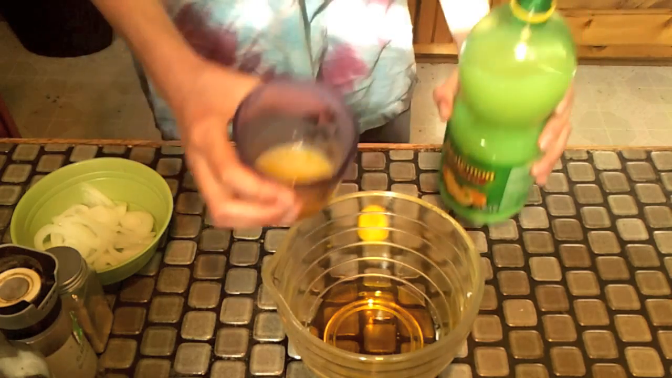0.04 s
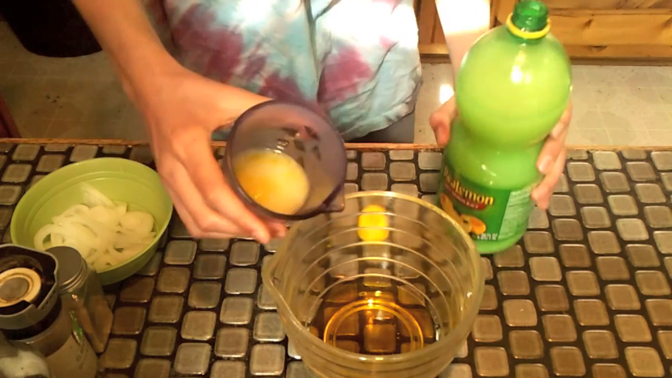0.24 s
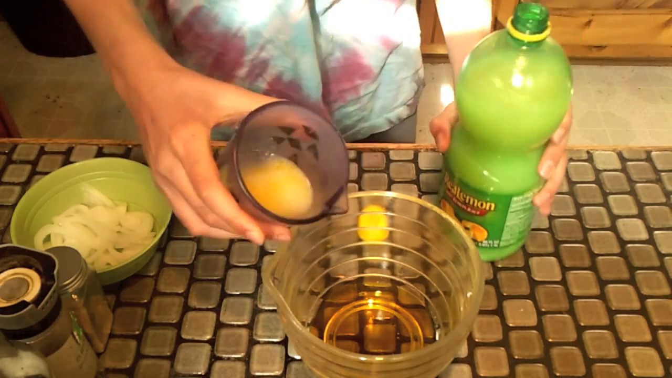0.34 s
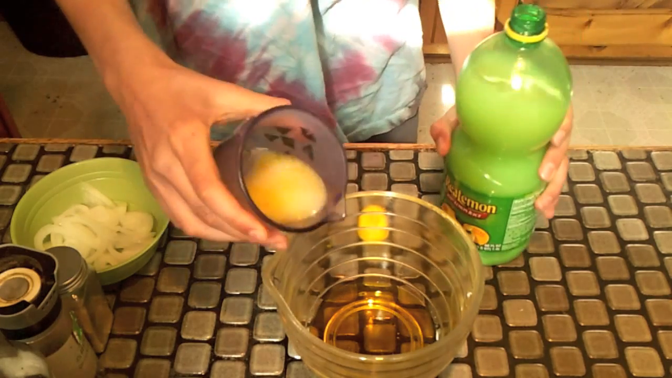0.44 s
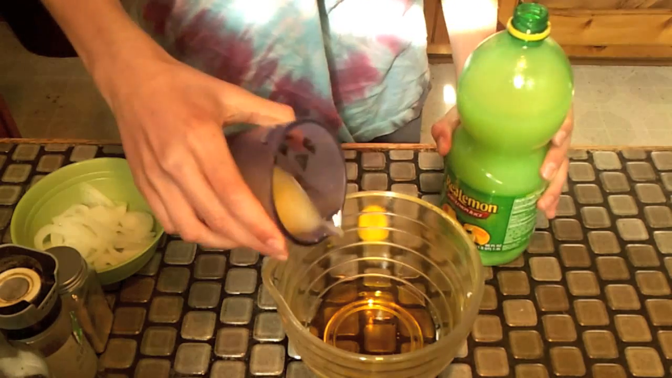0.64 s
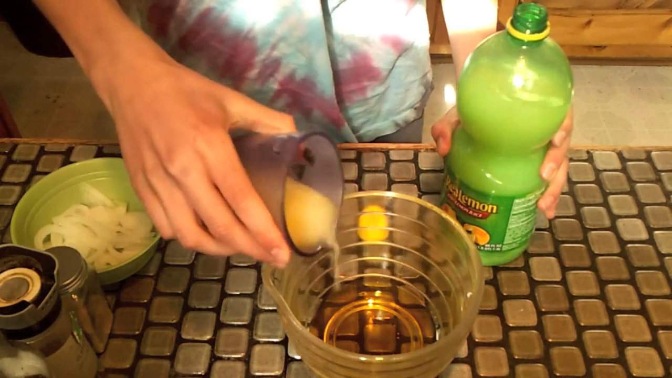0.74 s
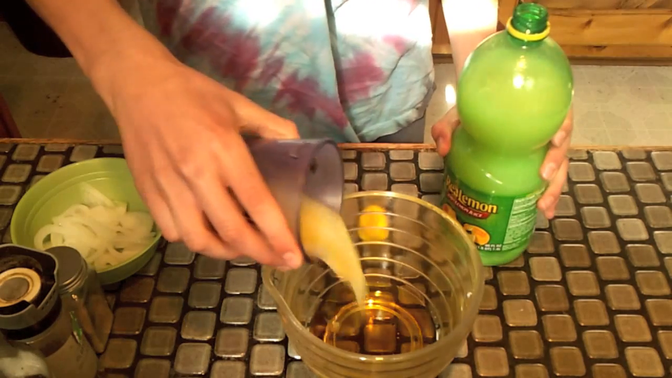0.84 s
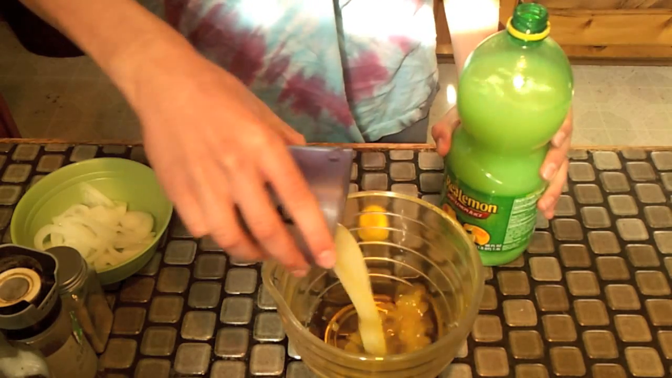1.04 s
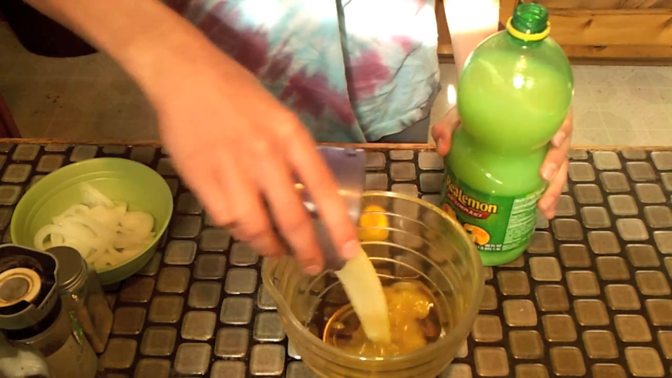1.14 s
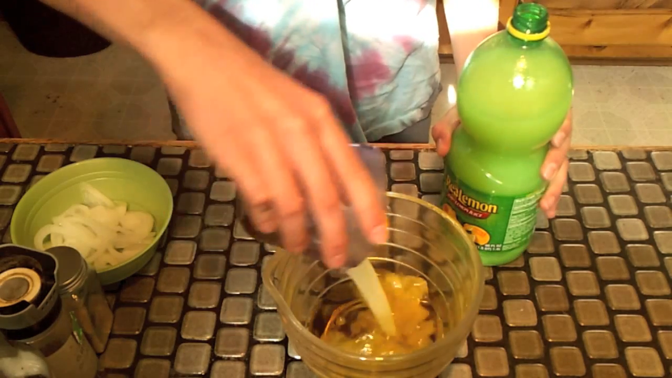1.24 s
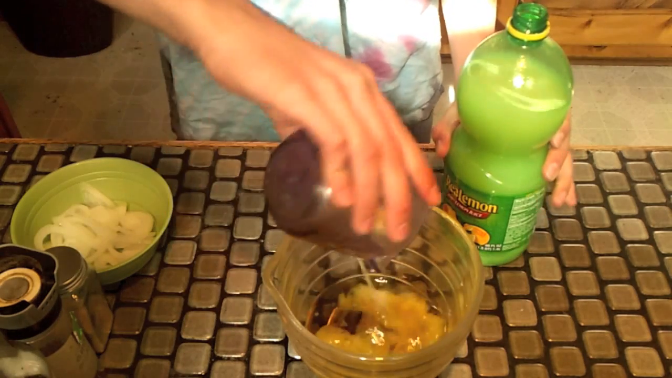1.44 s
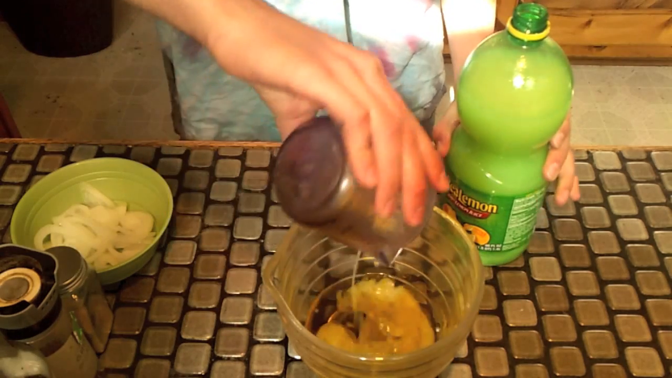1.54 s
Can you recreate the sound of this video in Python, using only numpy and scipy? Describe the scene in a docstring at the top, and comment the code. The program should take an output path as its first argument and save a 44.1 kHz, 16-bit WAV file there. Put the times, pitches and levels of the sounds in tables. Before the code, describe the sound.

A full plastic bottle knocks loudly on a tiled counter at about 0.25 seconds, ringing briefly. A light tap just after leaves a glass bowl ringing faintly, with a soft bump near 0.6. From 1.0 to 1.6 seconds juice pours quietly into oil: one bright drip at 1.1, then faint bubbles and small splashes. Low kitchen rumble, hiss and a thin electrical whine lie underneath.

```python
"""Bottle knock and a quiet pour

A full plastic bottle is set down hard on a tiled kitchen counter, which cracks and rings briefly.
A light tap sets a glass bowl ringing. Juice slides almost silently from a cup into the oil in the
bowl: one bright drip, then faint bubbles and small splashes. Under it lie a low room rumble, hiss
and a thin electrical whine."""
import sys
import numpy as np
from scipy import signal
from scipy.fft import rfft, irfft
from scipy.io import wavfile

SR = 44100
rng = np.random.default_rng(int(sys.argv[2]) if len(sys.argv) > 2 else 0)


def wrap_up_sound(samples):
    """Save the sound to the file named by the first command line argument, as 16-bit audio."""
    columns = np.atleast_2d(samples).T
    # keep every value between -1 and 1, then stretch to whole-number steps
    tamed = np.clip(columns, -1, 1)
    steps = np.round(tamed * 32767).astype(np.int16)
    wavfile.write(sys.argv[1], SR, steps)


N = 70560
TIME_S = np.arange(N) / SR
BINS_HZ = np.maximum(np.fft.rfftfreq(N, 1 / SR), 1)
KNOCK_S = 0.2457

# base hits the tiles, then rocks flat: delay_s, gain_db
CONTACTS = [(0, 6), (0.0021, -4)]
# contact noise spectrum: freq_hz, relative_db
CRACK_SPECTRUM = [(300, 10), (1100, -7), (1700, -17.5), (3000, -11), (3600, 2.5), (4500, -6), (7200, 3.5),
                  (8500, -25), (11000, -10.5), (16000, -46)]
# bottle and counter modes: pitch_hz, strength_db, t60_s
COUNTER_MODES = [(154.7, -15.5, 0.22), (196, -19, 0.15), (232.8, -9.5, .2), (419.8, -18, 0.24),
                 (467.5, -27.5, 0.35), (609, -34, 0.24), (699.3, -22, 0.37), (727, -7.5, 0.023),
                 (848, -10.5, 0.039), (1023, -7, 0.033), (3470, -8, 0.04), (3473, -30.5, 0.28),
                 (3590, -26, 0.035), (5650, -11, 0.022), (6335, -8.5, 0.043), (6410, -27, 0.19),
                 (6570, -40, 0.012), (8620, -48, .1), (9390, -42, 0.066)]


def bottle_knock(crack_db=-9.5, crack_t60_s=0.015, bass_cut_hz=109):
    """Each contact cracks; the modes ring once. The knock carries little deep bass."""
    grit = noise(CRACK_SPECTRUM)
    envelope = sum(from_db(crack_db + gain_db) * decay(KNOCK_S + delay_s, crack_t60_s)
                   for delay_s, gain_db in CONTACTS)
    blow = ring(KNOCK_S, COUNTER_MODES) + envelope * grit / grit.std()
    return butterworth(blow, 2, bass_cut_hz, "high")


# diffuse ringing: centre_hz, density_db, t60_s
TAIL_BANDS = [(60.6, -49, 0.34), (170, -49, 0.63), (282, -49, 0.32), (398, -42, 0.36), (700, -45.5, 0.35),
              (1006, -47.5, 0.33), (1600, -57.5, 0.27), (3150, -62, 0.2), (3360, -54.5, 0.3),
              (4640, -69.5, 0.19), (6250, -55, 0.33), (7300, -72.5, 0.25), (9900, -87.5, 0.35),
              (16000, -101, 0.11)]


def knock_tail(rise_s=0.0022):
    """Dense ringing of counter and kitchen builds quickly and dies band by band."""
    spectrum = rfft(noise(TAIL_BANDS))
    log_centres = np.log([row[0] for row in TAIL_BANDS])
    out = 0
    for (_, _, t60_s), selector in zip(TAIL_BANDS, np.eye(len(TAIL_BANDS))):
        band_gain = np.interp(np.log(BINS_HZ), log_centres, selector)
        out += irfft(spectrum * band_gain, N) * decay(KNOCK_S, t60_s)
    return out * rise(KNOCK_S, rise_s)


# glass bowl modes: pitch_hz, peak_db, t60_s
BOWL_MODES = [(825.2, -37.5, 1.2), (847.6, -30.5, .66), (2105.5, -35.5, .72), (2172.7, -38, .63)]


def bowl_clink(start_s=0.305):
    """A light tap on the rim rings paired modes that beat."""
    return ring(start_s, BOWL_MODES)


# drips and bursting bubbles: centre_s, pitch_hz, peak_db
DRIPS = [(1.1008, 5560, -9.5), (1.1171, 5500, -43), (1.1469, 4030, -38), (1.1555, 2840, -51),
         (1.1646, 6100, -37), (1.2091, 5860, -35.5), (1.2195, 2850, -50), (1.4050, 8000, -39),
         (1.4172, 5300, -39), (1.4555, 6500, -29.5), (1.4646, 5400, -32.5), (1.5724, 6100, -31.5)]
# bowl wall reflections: delay_s, gain_db
BOWL_ECHOES = [(.0011, -29), (.0022, -14.5), (.0038, -19)]


def drips(sigma_cycles=2.1):
    """Each tiny bubble swells and fades within a few cycles and echoes inside the bowl."""
    direct = 0
    for centre_s, pitch_hz, peak_db in DRIPS:
        cycles = (TIME_S - centre_s) * pitch_hz
        direct += from_db(peak_db) * gaussian(cycles, sigma_cycles) * np.cos(2 * np.pi * cycles)
    echoes = sum(from_db(gain_db) * np.interp(TIME_S - delay_s, TIME_S, direct)
                 for delay_s, gain_db in BOWL_ECHOES)
    return direct + echoes


# wet ticks and taps: start_s, centre_hz, level_db
TICKS = [(0.1143, 5700, -36), (0.2246, 6250, -36.5), (.3040, 5610, -18), (0.5729, 6020, -34.5),
         (1.022, 5900, -39.5), (1.1739, 5620, -36.5), (1.2477, 5900, -34), (1.3164, 5900, -35.5),
         (1.3262, 5800, -29.5), (1.455, 7060, -34), (1.5288, 6800, -37.5), (1.5383, 6900, -41),
         (1.5511, 4100, -28), (1.5508, 5660, -28.5), (1.5639, 3320, -46)]


def ticks(t60_s=0.013, width_octaves=0.33, spray_db=-18):
    """Each tick is a short narrow-band burst with a little wider spray."""
    spray = from_db(spray_db) * butterworth(rng.standard_normal(N), 3, [1400, 8500], "band")
    out = 0
    for start_s, centre_hz, level_db in TICKS:
        edges_hz = centre_hz * 2 ** (np.array([-0.5, 0.5]) * width_octaves)
        envelope = decay(start_s, t60_s)
        burst = butterworth(rng.standard_normal(N) * envelope, 2, edges_hz, "band")
        out += from_db(level_db) * (burst / np.abs(burst).max() + spray * envelope)
    return out


# larger bubbles: start_s, pitch_hz, strength_db
PLOPS = [(1.023, 1400, -41.5), (1.22, 2700, -46), (1.249, 1650, -48), (1.552, 1570, -40.5),
         (1.5643, 1810, -42.5)]


def plops():
    """The stream plops softly into the oil."""
    return sum(bubble(*row) for row in PLOPS)


def bubble(start_s, pitch_hz, strength_db, rise_cycles=0.66, t60_cycles=42):
    """A bubble in thick liquid swells and rings briefly."""
    tone = ring(start_s, [(pitch_hz, strength_db, t60_cycles / pitch_hz)])
    return rise(start_s, rise_cycles / pitch_hz) * tone


def gurgle(centre_s=1.21, sigma_s=0.1, count=60, rate_per_s=120, low_hz=393, high_hz=1000, base_db=-50):
    """The stream folds faint, low bubbles into the oil, loudest at the height of the pour."""
    out = 0
    for k, (jitter, pitch_draw, strength_draw) in enumerate(rng.random((count, 3))):
        offset_s = (k - count / 2 + jitter) / rate_per_s
        pitch_hz = low_hz * (high_hz / low_hz) ** pitch_draw
        gain = gaussian(offset_s, sigma_s) * (0.5 + strength_draw) * np.sqrt(low_hz / pitch_hz)
        out += gain * bubble(centre_s + offset_s, pitch_hz, base_db)
    return out


def counter_bump(centre_s=0.576, sigma_s=0.017, pitch_hz=205, peak_db=-38.5):
    """A padded touch makes the counter hum for a few cycles."""
    offset_s = TIME_S - centre_s
    return from_db(peak_db) * gaussian(offset_s, sigma_s) * np.sin(2 * np.pi * pitch_hz * offset_s)


# handling noise: freq_hz, density_db
RUSTLE_SPECTRUM = [(300, -105), (1000, -94.5), (1800, -93), (3500, -99), (6000, -103), (16000, -112)]


def hand_rustle(fade_s=0.03):
    """Hands rustle faintly until the bottle lands."""
    return noise(RUSTLE_SPECTRUM) * np.clip((KNOCK_S - TIME_S) / fade_s, 0, 1)


def kitchen_reverb(x, gain_db=-18, first_echo_s=0.0041, t60_s=0.27):
    """The small room's walls return a short, diffuse tail."""
    response = rng.standard_normal(N) * decay(first_echo_s, t60_s)
    return from_db(gain_db) * signal.fftconvolve(x, response / np.linalg.norm(response))[:N]


# rumble and hiss: freq_hz, density_db
ROOM_SPECTRUM = [(10, -60.5), (28, -61), (60, -63.5), (120, -67.5), (250, -76.5), (500, -84.5),
                 (900, -92.5), (1800, -95.5), (4000, -99), (6200, -94.5), (9000, -100), (16000, -101)]
# electrical whine: pitch_hz, rms_db
WHINE_TONES = [(5879.7, -56.5), (6119.7, -61.5), (6359.5, -72), (7779, -78), (7837.6, -65.5), (7897.3, -73)]


def room_tone():
    """Steady rumble, hiss and electrical whine."""
    whine = sum(np.sqrt(2) * from_db(rms_db) * np.sin(2 * np.pi * (pitch_hz * TIME_S + rng.random()))
                for pitch_hz, rms_db in WHINE_TONES)
    return noise(ROOM_SPECTRUM) + whine


def from_db(db):
    return 10 ** (np.asarray(db) / 20)


def gaussian(offset, sigma):
    return np.exp(-0.5 * (offset / sigma) ** 2)


def rise(start_s, tau_s):
    return 1 - np.exp(-np.maximum(TIME_S - start_s, 0) / tau_s)


def decay(start_s, t60_s):
    return (TIME_S >= start_s) * from_db(-60 * np.maximum(TIME_S - start_s, 0) / t60_s)


def butterworth(x, order, edges_hz, kind):
    return signal.sosfilt(signal.butter(order, edges_hz, kind, fs=SR, output="sos"), x + 1e-18)


def noise(spectrum):
    """Noise with the given power per Hz, interpolated along log frequency."""
    freq_hz, density_db = np.array(spectrum).T[:2]
    gain = from_db(np.interp(np.log(BINS_HZ), np.log(freq_hz), density_db))
    return irfft(rfft(rng.standard_normal(N)) * gain, N) * np.sqrt(SR / 2)


def ring(start_s, modes):
    """Damped sines struck together, neighbours in opposite directions."""
    age_s = TIME_S - start_s
    return sum((-1) ** k * from_db(level_db) * decay(start_s, t60_s) * np.sin(2 * np.pi * hz * age_s)
               for k, (hz, level_db, t60_s) in enumerate(modes))


def scene(splash_send_db=9):
    """Knock, clink, then the pour; splashes reverberate more than drips."""
    background = room_tone()
    bottle = bottle_knock() + knock_tail()
    pings = drips()
    splashes = plops() + ticks()
    reverb = kitchen_reverb(pings + from_db(splash_send_db) * splashes)
    pour = pings + splashes + reverb + gurgle()
    return (bottle + bowl_clink() + pour + counter_bump() + hand_rustle() + background)[None]


def record(dry, threshold_db=-6.5, slope=0.3, attack_s=0.045, release_db_per_s=2.5, cutoff_hz=16000):
    """The knock just overloads the recorder, whose gain dips and slowly recovers; the top is cut."""
    clipped = np.clip(dry, -1, 1)
    level_db = 20 * np.log10(np.abs(clipped) + 1e-9)
    dip_db = slope * np.maximum(level_db - threshold_db, 0)
    release_db = release_db_per_s * TIME_S
    held_db = np.maximum.accumulate(dip_db + release_db, axis=-1) - release_db
    pole = np.exp(-1 / (attack_s * SR))
    gain = from_db(-signal.lfilter([1 - pole], [1, -pole], held_db))
    lowpass = signal.ellip(10, 0.1, 60, cutoff_hz, fs=SR, output="sos")
    return signal.sosfilt(lowpass, gain * clipped)


dry = scene()
out = record(dry)
wrap_up_sound(out)
```